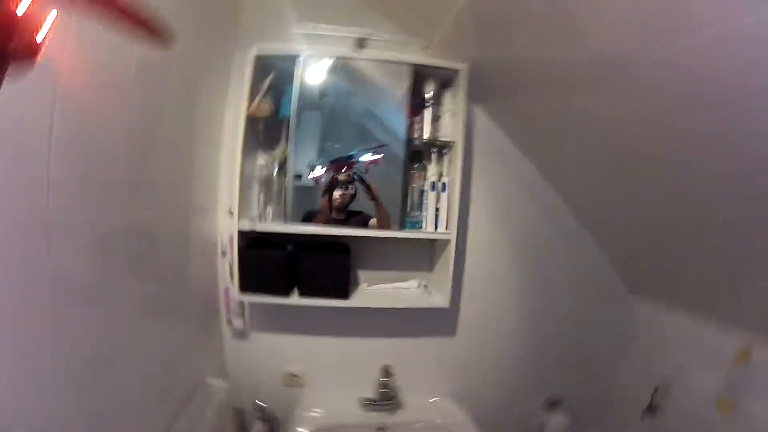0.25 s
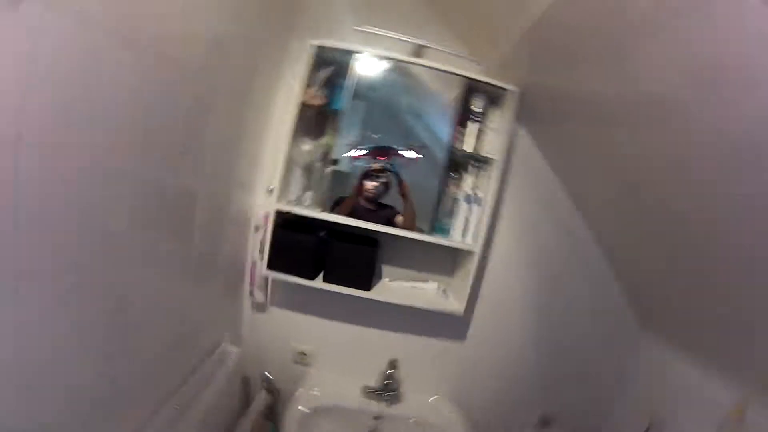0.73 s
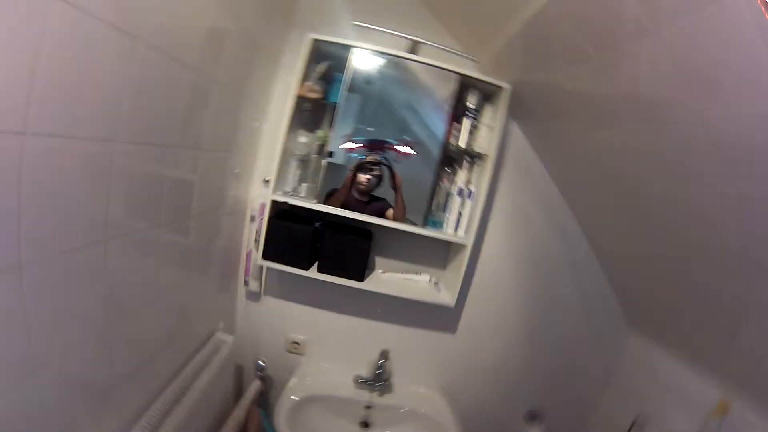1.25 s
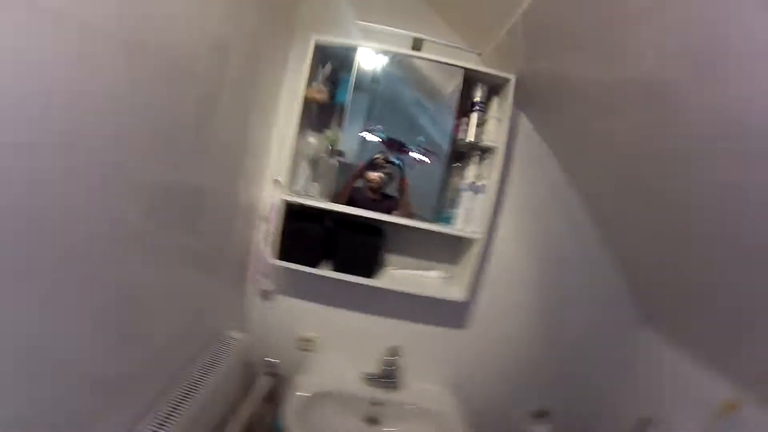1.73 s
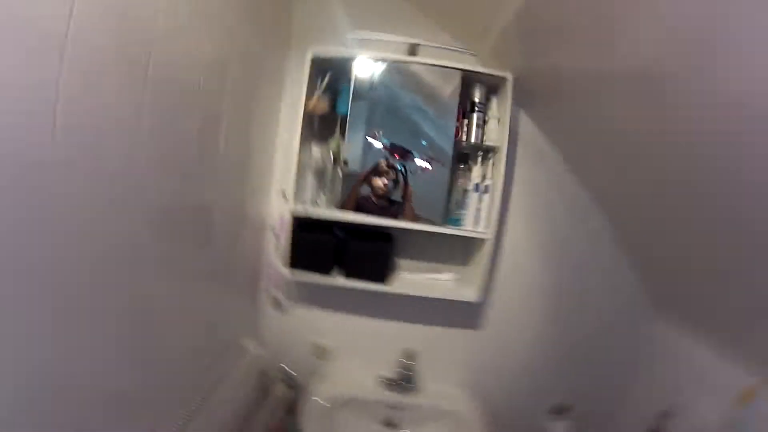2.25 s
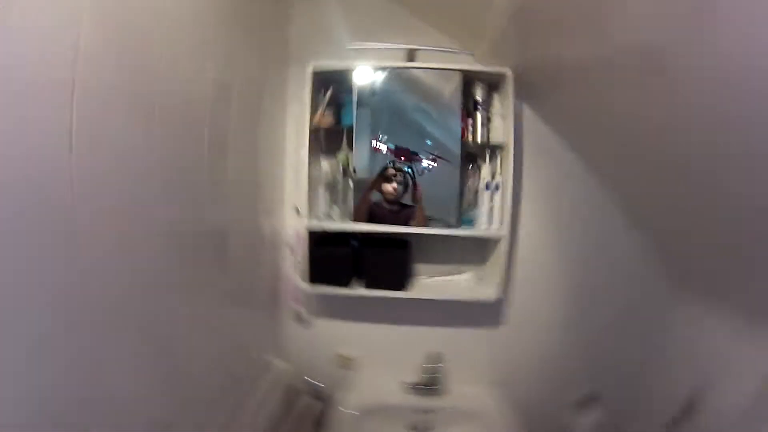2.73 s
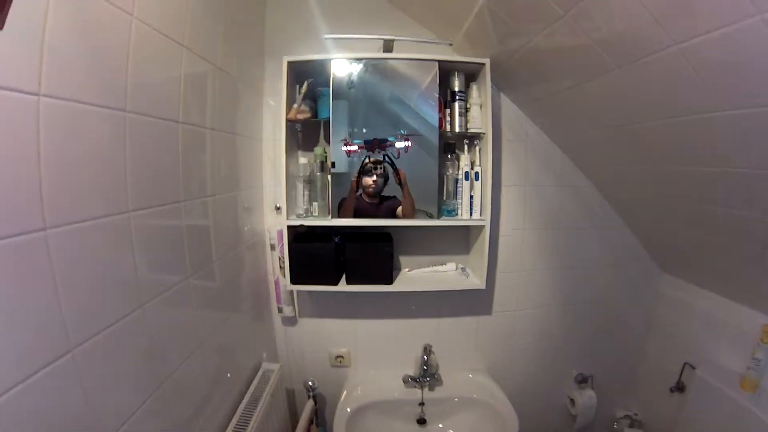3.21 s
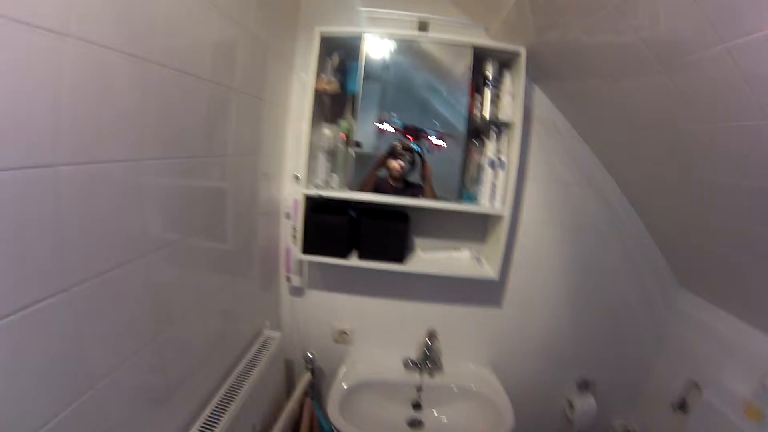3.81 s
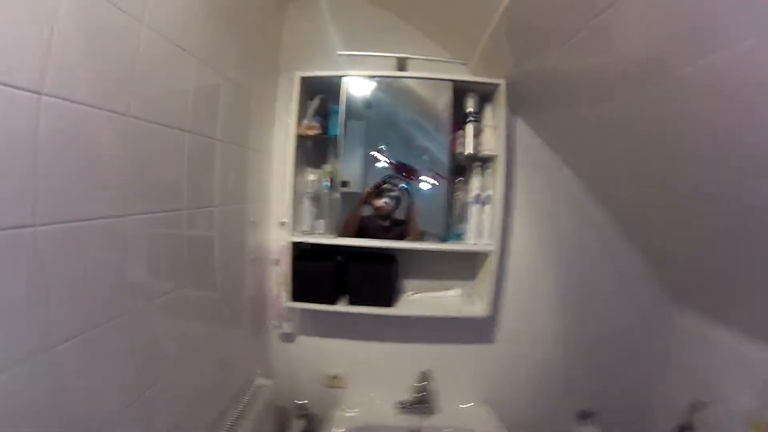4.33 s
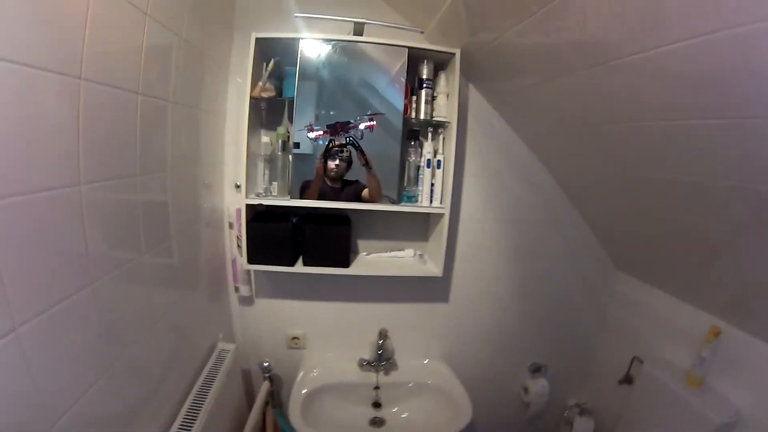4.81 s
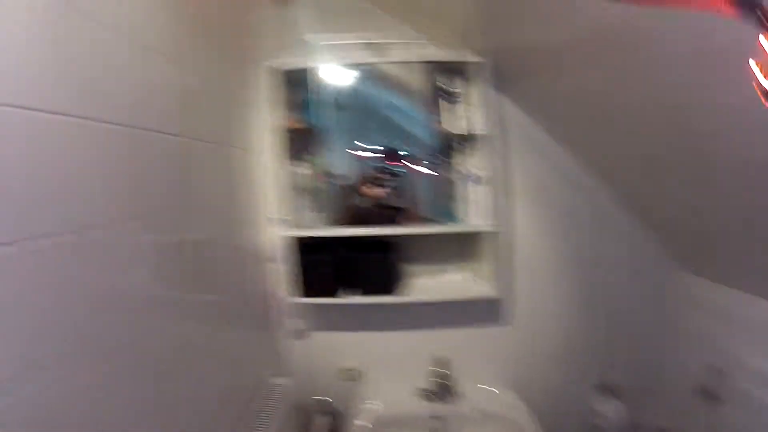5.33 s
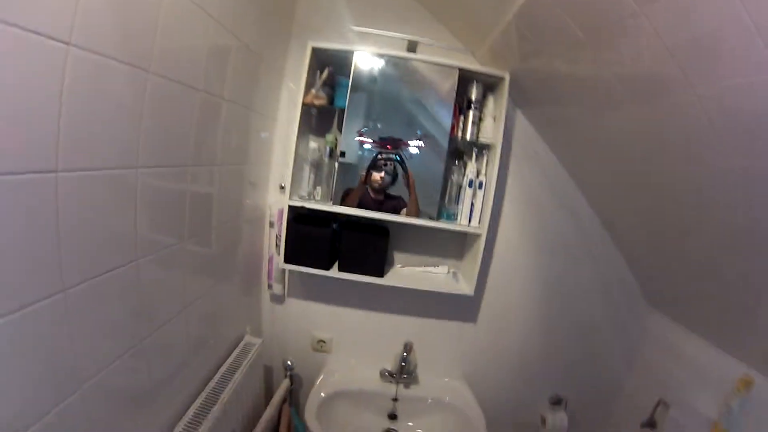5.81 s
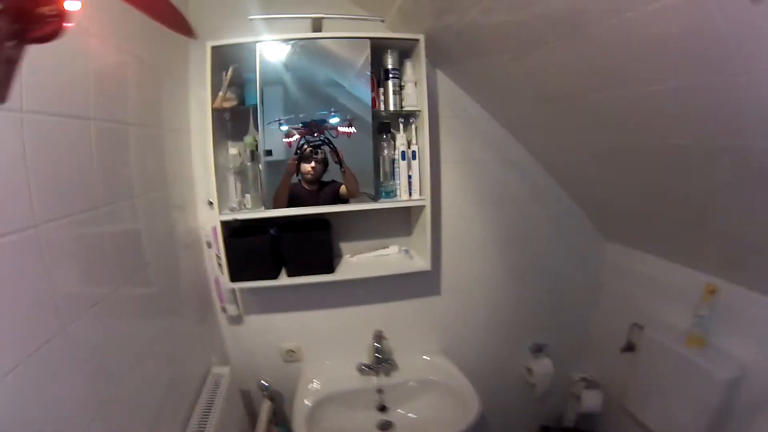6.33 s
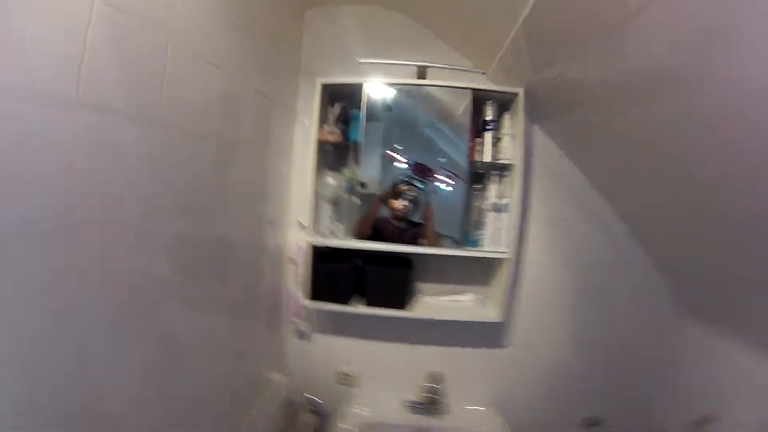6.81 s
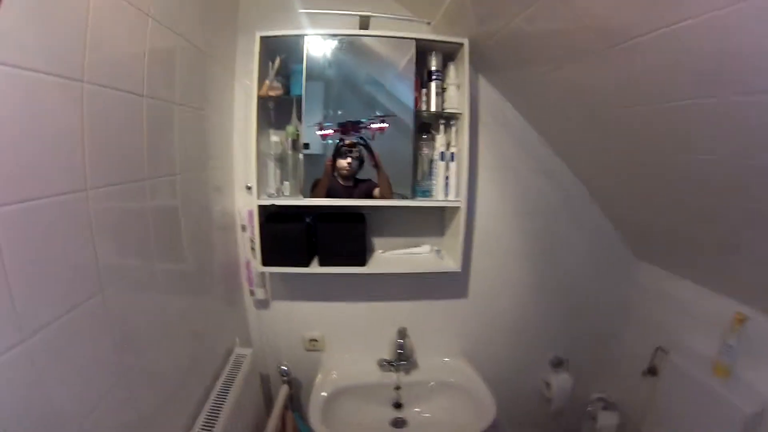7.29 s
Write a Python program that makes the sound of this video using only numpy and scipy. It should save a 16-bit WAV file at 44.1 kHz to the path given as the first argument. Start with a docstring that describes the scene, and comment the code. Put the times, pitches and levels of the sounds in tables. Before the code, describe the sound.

A dry, very close mono sound of two small metal-gear servos in a quiet tiled room with a short faint reflection. It opens with weak chatter and a brief low growl, then one slow rasping move at about 0.2 s. From 0.4 to 3.0 s the servo whirrs to and fro at full speed, ten bright buzzing swings of roughly a quarter second each, every one running up quickly, whining, and braking into the reversal. From 3.1 to 3.45 s it nearly stops: faint chatter and tiny metallic ticks. A harsh double grind follows at 3.5-3.8 s, then chatter, and slower grainy moves around 4.2, 4.5-5.0, 5.1-5.5, 5.7-6.1, 6.4-6.7 and 6.9-7.3 s, rising and sagging in pitch, with quieter chatter between. From 3.9 s a second servo growls softly and low underneath. A last tick and weak chatter close it near 7.5 s, above faint room hush and low rumble.

```python
"""A small tiled room; one microphone on a camera, very near the two metal-gear micro servos of its mount.
First a little chatter and one slow move, then the roll servo whirs to and fro at full speed.
Around three seconds it holds, chattering and ticking; after that come slow grinding moves, to the end.
There the tilt servo, heard briefly at the start, growls along through the bracket under the camera.
Rattle is noise cut into tooth contacts, whine is sines locked to the shaft; faint room noise lies below."""
import sys
import numpy as np
from scipy import signal
from scipy.fft import rfft, irfft, next_fast_len
from scipy.io import wavfile
from scipy.ndimage import uniform_filter1d, map_coordinates

SR = 44100
rng = np.random.default_rng(int(sys.argv[2]) if len(sys.argv) > 2 else 0)


def persist_wave(psi):
    """Save psi, clipped to +-1, as 16-bit WAV."""
    counts = np.round(np.clip(psi, -1, 1) * 32767).astype(np.int16)
    wavfile.write(sys.argv[1], SR, np.atleast_2d(counts).T)


N = 333396

# Roll servo, full-speed swings: start t/s, length t/s, braking t/s, direction (1 forward, 0 backward),
# level/dB before the gain for speed
SWINGS = [(.418, .259, 0.034, 0, -27), (0.669, 0.26, 0.064, 1, -27), (0.933, 0.28, 0.038, 0, -27),
          (1.199, 0.27, 0.048, 1, -27), (1.479, .288, 0.039, 0, -26.5), (1.761, 0.28, .048, 1, -26.5),
          (2.053, .276, .042, 0, -27), (2.328, .284, .09, 1, -27), (2.596, .26, .07, 0, -27),
          (2.853, 0.19, 0.096, 1, -26.5)]
# Roll servo, slow moves: start t/s, speeding up t/s, slowing down t/s, top speed f/Hz, last speed f/Hz,
# direction (1 forward, 0 backward), level/dB before the gain for speed
SLOW_MOVES = [(.165, 0.096, 0.12, 112.4, 43.98, 1, -25), (3.47, .074, .012, 112, 110.2, 1, -24.5),
              (3.562, 0.17, 0.085, 177.9, 44.8, 0, -27), (4.158, .125, .08, 134.8, 54.95, 0, -28.5),
              (4.478, 0.15, 0.44, 126, 56.05, 1, -28.5), (5.085, .315, 0.11, 148.7, 128.8, 0, -27.5),
              (5.678, .05, 0.42, 136.8, 58, 1, -27), (6.395, 0.16, 0.14, 152.5, 119.2, 0, -27.5),
              (6.925, .07, .29, 120.2, 64.02, 1, -27)]
# Roll servo, chatter against its load between moves: start t/s, length t/s, motor speed f/Hz, mean level/dB
CHATTER = [(0, 0.16, 43.53, -39), (3.082, 0.067, 40, -37), (3.174, 0.042, 40.44, -42.5),
           (3.27, 0.039, 40.44, -55), (3.32, .1, 40.06, -46), (3.867, 0.26, 47.9, -38.5),
           (4.361, 0.12, 61.9, -40.5), (5.508, 0.12, 52.77, -40), (6.225, 0.1023, 49.86, -39.5),
           (6.321, 0.082, 65.3, -35), (6.699, 0.14, 52.9, -38), (6.859, 0.074, 49.7, -42),
           (7.409, .022, 40.9, -38), (7.454, 0.12, 40.9, -38.5)]
# Tooth rattle, colour: f/Hz, relative level/dB
RATTLE_COLOUR = [(60, -33), (300, -10.5), (700, -16), (1100, -12.5), (1700, -2), (2500, -2.5), (4000, 5),
                 (5500, 6.5), (7000, 2.5), (9500, 7), (10700, 4.5), (13500, 4.5), (14300, 3), (15500, -1.5)]
# Case resonances: f/Hz, width f/Hz, forward level/dB, backward level/dB,
# level/dB added when labouring at part speed forward, the same backward
CASE_MODES = [(1436.8, 1600, -28, -28, 10.5, 14), (2747, 630, -16.5, -14.5, 4, 4),
              (3460, 190, -18.5, -19, 7, 1), (4860, 490, -24, -14.5, -8, -1),
              (7100, 730, -11.5, -23, 0.5, -3), (8375, 2050, -5.5, -5.5, -1, -1),
              (11480, 770, -4, -7, -9.5, 0.5)]
# Gear whine: cycles per turn of the first wheel, one entry a line
WHINE_CYCLES = [3, 8, 16, 22, 24, 30, 32, 38, 42, 48, 54, 60, 72, 78, 80, 102, 120]
# Mean level/dB of each whine line before the gains for speed, turning forward and backward
WHINE_FORWARD_DB = [-29.5, -27.5, -36.5, -25.5, -19, -35, -23.5, -28.5, -34, -38, -23.5, -16, -15, -9,
                    -13.5, -9.5, -28]
WHINE_BACKWARD_DB = [-45, -25, -41, -42, -17.5, -39, -41, -17, -48, -21.5, -43, -10, -36, -19, -8, -38, -9]
# Gear backlash ticks: t/s, relative level/dB
TICKS = [(3.096, -22), (3.1817, -21.5), (3.2017, -26), (3.2792, -20), (3.308, -23.5), (3.3241, -24),
         (3.352, -20.5), (3.3976, -22), (3.4054, -25), (3.4154, -22), (3.426, -24), (3.8777, -18.5),
         (7.456, -19)]
# Tilt servo, moves: start t/s, speeding up t/s, slowing down t/s, nominal top speed f/Hz, nominal top level/dB
TILT_MOVES = [(-.06, .09, .17, 64, -47.5), (3.88, .155, 0.093, 124, -44),
              (4.155, 0.037, 0.096, 100.3, -46.5), (4.2, .1, .15, 106.6, -44.5),
              (4.38, .12, .14, 68, -48.5), (4.63, .15, .28, 75.9, -48.5), (5.07, .06, .24, 56, -50),
              (5.39, .13, .14, 114, -47.5), (5.68, .22, .2, 57.7, -58), (6.135, .17, 0.29, 76.2, -47.5),
              (6.55, 0.21, 0.28, 99.56, -46.5), (7.11, 0.061, 0.4, 66.17, -50.5)]
# Tilt bracket resonances: f/Hz, width f/Hz, relative level/dB
BRACKET_MODES = [(134, 39, -9), (241.5, 7, 5), (315, 48, -3.5), (449, 82, -7.5), (545, 84, -3),
                 (905, 85, -10)]
# Tilt gear hiss, colour: f/Hz, relative level/dB
HISS_COLOUR = [(300, -24), (1100, -12.5), (2700, 1), (3400, 4), (5000, 0), (6300, 3.5), (7800, 10),
               (9700, -4.5), (11300, 1.5), (13000, -5), (15500, -8)]
# Tiled room: f/Hz, 60 dB decay t/s
ROOM_DECAY = [(200, 0.43), (2000, 0.2), (12000, 0.12)]
# Room and microphone floor, colour: f/Hz, relative level/dB
FLOOR_COLOUR = [(15, -1), (45, 7), (65, -4), (95, -16), (250, -1.5), (700, -17), (3000, -8.5),
                (15000, -42.5)]

TEETH, REDUCTION = 8, 3  # pinion teeth; motor turns per turn of the first wheel
FORWARD_HZ, BACKWARD_HZ, SPIN_UP_S = 202.36, 193.25, .03  # top motor speeds; time constant of the run-up
SAG_HZ_PER_S = 48  # a backward swing loses speed against the load
REVERSAL_HZ = 49  # lowest speed used for swing level: the gears never quite stop rattling
RACING_DB, RACING_FROM_HZ = 2.5, 156  # extra level as the forward speed nears its top
BRAKE_DB, BRAKE_SWELL_S = 1, 0.062  # the teeth knock harder as backward braking sets in
BREAKAWAY_HZ, SLOWING_POWER = 53.93, 1.35  # speed at which a slow move starts; bend of the slowing
IDLE_HZ, IDLE_DB = 40, -47  # the roll servo holding still
CHATTER_WAVER_DB = 0.55
KNEE_HZ, KNEE_POWER = 102.6, 3.93  # below this motor speed the gears quieten quickly
ATTACK_S, RELEASE_S = .02, .014
SING_FROM_HZ, SING_DB_PER_OCTAVE = 228, 20  # the highest mesh tones fade below this motor speed
CREEP_RING_HZ, CREEP_WIDTH_HZ, CREEP_DB = 4900, 680, -13  # case resonance heard when creeping backward
CREEP_SPEED_HZ, CREEP_RANGE_HZ = 95, 32  # the motor speeds that excite it
TILT_IDLE_HZ, TILT_IDLE_DB = 41.93, -65  # the tilt servo holding still
TILT_SWELL_DB = 10  # rise of level over a full arch of speed
TOP_HZ = 15550  # band limit of the camera


def roll_servo(speed, level_db, forward):
    """Tooth rattle rings the case, the meshes whine; each direction loads other tooth flanks."""
    def flank(forward_db, backward_db):
        return backward_db + forward * (forward_db - backward_db)

    octaves = np.log2(speed / 150)
    # Below full speed the motor is driven in short kicks, less so in a hard run-up.
    run_up = acceleration(speed, full=1500)
    throttled = np.clip((178 - speed) / 40, 0, 1) * (1 - .75 * run_up)
    turns = shaft(speed, flutter=.002 + .045 * throttled)
    labour = throttled * np.clip((speed - 70) / 55, 0, 1)
    # The kicks make the rattle grainy.
    kicks = amp(np.clip(.5 - 2.3 * octaves, 0, 4) * wobble(260))

    def contact():
        return steady(teeth(turns, scatter_db=3.0, sharpness=3.2, worn=0.52) * kicks)

    rattle = amp(-1.5) * coloured(contact(), RATTLE_COLOUR)
    for hz, width, forward_db, backward_db, *labour_db in CASE_MODES:
        ring_db = flank(forward_db, backward_db) + flank(*labour_db) * labour
        rattle += amp(ring_db) * unit(ringing(contact(), hz, width))
    creep = (1 - forward) * np.exp(-((speed - CREEP_SPEED_HZ) / CREEP_RANGE_HZ) ** 2)
    rattle += amp(CREEP_DB) * creep * unit(ringing(contact(), CREEP_RING_HZ, CREEP_WIDTH_HZ))
    # Lightly loaded teeth land softly and lose their top.
    top = filtered(rattle, lambda f: 1 / (1 + (8500 / (f + 1)) ** 6))
    rattle += (amp(np.minimum(level_db + 22.0, 0)) - 1) * top

    whine = gear_lines(turns, map(flank, WHINE_FORWARD_DB, WHINE_BACKWARD_DB))
    # The low mesh tones travel through the bracket; the high ones need speed to sing out.
    low = filtered(whine, lambda f: 1 / (1 + (f / 560) ** 8))
    highest = filtered(whine, lambda f: 1 / (1 + (4200 / (f + 1)) ** 12))
    sing = amp(SING_DB_PER_OCTAVE * np.minimum(np.log2(speed / SING_FROM_HZ), 0))
    high = whine - low + (sing - 1) * highest
    low_db = -3 + flank(1.3, 6.2) * throttled + 9.9 * np.minimum(octaves + 0.59, 0)
    high_db = 1.5 - 6.9 * throttled + flank(6.6, 16) * np.minimum(octaves, 0)
    whine = amp(low_db) * low + amp(high_db) * high
    return amp(level_db) * (rattle + whine + forward * squeal(speed))


def roll_motion():
    """Motor speed (Hz), level (dB) and share of forward drive, from the swings, slow moves and chatter."""
    t = np.arange(N) / SR
    speed, gain, forward = np.full(N, 1. * IDLE_HZ), np.full(N, amp(IDLE_DB)), np.zeros(N)

    def add(span, hz, loudness, direction):
        """The strongest drive sets speed and level, the last one added sets direction."""
        speed[span] = np.maximum(speed[span], hz)
        gain[span] = np.maximum(gain[span], loudness)
        forward[span] = direction > .5

    for start, length, braking, direction, db in SWINGS:
        span = (t > start) & (t < start + length)
        u = t[span] - start
        top_hz = FORWARD_HZ if direction > .5 else BACKWARD_HZ - SAG_HZ_PER_S * u
        hz = top_hz * (1 - np.exp(-u / SPIN_UP_S)) * glide(u, length - braking, braking, 1, 1, 0)
        if direction > .5:
            extra_db = RACING_DB * np.clip((hz - RACING_FROM_HZ) / (FORWARD_HZ - RACING_FROM_HZ), 0, 1)
        else:
            extra_db = BRAKE_DB * np.exp(-((u - length + braking) / BRAKE_SWELL_S) ** 2)
        add(span, hz, gear_gain(np.maximum(hz, REVERSAL_HZ)) * amp(db + extra_db), direction)
    for start, length, hz, db in CHATTER:
        span = (t > start) & (t < start + length + RELEASE_S)
        waver_db = CHATTER_WAVER_DB * wobble(40)[span]
        add(span, hz, amp(db + waver_db) * gate(t[span] - start, length), 0)
    for start, rise, fall, top_hz, last_hz, direction, db in SLOW_MOVES:
        span = (t > start) & (t < start + rise + fall + RELEASE_S)
        u = t[span] - start
        hz = glide(u, rise, fall, BREAKAWAY_HZ, top_hz, last_hz)
        on = gate(u, rise + fall)
        add(span, hz * np.sqrt(on), gear_gain(hz) * amp(db) * on, direction)
    return speed, 20 * np.log10(gain), uniform_filter1d(forward, size=600)


def gear_gain(speed):
    """The gears grow steeply louder with speed, then level off."""
    return 1 / np.sqrt(1 + (KNEE_HZ / (speed + 1)) ** KNEE_POWER)


def steady(x):
    """The load sets the level and the teeth only share it out; elastic gears cap the hardest knocks."""
    shared = x / np.sqrt(np.abs(uniform_filter1d(x ** 2, size=500)) + 1e-9)
    return np.tanh(shared / 2.2)


def gear_lines(turns, levels_db):
    """Mesh tones that follow the shaft, each a little unsteady in phase and level."""
    out = np.zeros(N)
    for cycles, db in zip(WHINE_CYCLES, levels_db):
        phase = 2 * np.pi * cycles * turns / REDUCTION + 0.22 * wobble(150)
        out += amp(db + 2.94 * wobble(30)) * np.sin(phase)
    return out


def squeal(speed):
    """Upper mesh tones ring a case resonance: clean in a fast run-up, rough at a crawl."""
    run_up = acceleration(speed, full=700)
    turns = shaft(speed, flutter=.025 - .023 * run_up)

    def mesh(orders):
        return sum(np.sin(2 * np.pi * order * turns) for order in orders)

    fast = run_up * np.clip((speed - 110) / 35, 0, 1)
    sweep = fast * ringing(mesh((20, 24)), 3550, 1300)
    crawl = np.clip((150 - speed) / 20, 0, 1) * np.clip((speed - 50) / 25, 0, 1) * (1 - run_up)
    squeak = crawl * ringing(mesh((24, 26, 30, 34, 40, 48)), 3320, 480)
    return amp(-6) * (sweep + squeak)


def backlash():
    """A holding servo nudges its gears across their play: tiny metal ticks, noise crack and ring."""
    t = np.arange(SR // 20) / SR
    out = np.zeros(N + SR)
    for start, db in TICKS:
        crack = amp(-60 * t / 0.01) * rng.standard_normal(len(t))
        ring = np.zeros(len(t))
        for hz, t60 in [(2850, 0.0087), (4900, 0.0085)]:
            ring += amp(-60 * t / t60) * np.sin(2 * np.pi * hz * t) * rng.uniform(0.33, 1)
        out[round(start * SR):][:len(t)] += amp(db - 7.0) * (crack + 0.8 * ring)
    return ringing(out[:N], 5000, 13000)


def tilt_servo(speed, level_db):
    """Its teeth shake the bracket under the camera; the second mesh hums when it speeds up."""
    turns = shaft(speed, flutter=.03)
    contact = teeth(turns, scatter_db=2, sharpness=6.5, worn=0.38)

    def bracket(f):
        """Modes of alternating sign, summed."""
        return sum((-1) ** k * amp(db) * resonance(f, hz, width)
                   for k, (hz, width, db) in enumerate(BRACKET_MODES))

    growl = amp(0.5) * unit(filtered(contact, bracket))
    mesh = 2 * np.pi * turns * TEETH / REDUCTION
    hum_db = np.clip(22 * np.log2(speed / 115), -14, 2) + 4.5 * wobble(60)
    hum = amp(hum_db) * (np.sin(mesh) + 0.14 * np.sin(2 * mesh))
    # The airborne hiss follows the level on its own slope.
    hiss_db = -44 + 1.1 * (level_db + 49.5)
    hiss = amp(hiss_db) * coloured(contact * amp(1.9 * wobble(110)), HISS_COLOUR)
    return amp(level_db) * (growl + hum) + hiss


def tilt_motion():
    """Motor speed (Hz) and level (dB): every move is one arch, louder as it speeds up."""
    t = np.arange(N) / SR
    speed, gain = np.full(N, 1. * TILT_IDLE_HZ), np.full(N, amp(TILT_IDLE_DB))
    for start, rise, fall, top_hz, db in TILT_MOVES:
        span = (t > start) & (t < start + rise + fall + RELEASE_S)
        u = t[span] - start
        arch = glide(u, rise, fall, 0, 0.98, 0)
        loudness = amp(db + TILT_SWELL_DB * (arch - 1)) * gate(u, rise + fall)
        speed[span] = np.maximum(speed[span], TILT_IDLE_HZ + (top_hz - TILT_IDLE_HZ) * arch)
        gain[span] = np.maximum(gain[span], loudness)
    return speed, 20 * np.log10(gain)


def shaft(speed, flutter):
    """Turns made by a slightly unsteady motor."""
    return np.cumsum(speed * (1 + flutter * wobble(120))) / SR


def acceleration(speed, full):
    """Share of a hard run-up, 0 to 1; full is the rise of motor speed in Hz per second that counts as 1."""
    return np.clip(np.gradient(uniform_filter1d(speed, size=900)) * SR / full, 0, 1)


def teeth(turns, scatter_db, sharpness, worn):
    """Each pinion tooth lands with its own force and scrapes off; the wear marks repeat with the wheel."""
    count, phase = np.divmod(turns * TEETH, 1)
    force = amp(scatter_db * rng.standard_normal(N))[count.astype(int)]
    marks = rng.standard_normal(size=600)
    wear = map_coordinates(marks, [turns / REDUCTION % 1 * len(marks)], mode='grid-wrap')
    return unit(force * np.exp(-sharpness * phase) * (rng.standard_normal(N) + worn * wear))


def glide(t, rise, fall, first_hz, top_hz, last_hz):
    """Motor speed of one move: it eases up to its top, then slows ever faster."""
    up = np.sin(np.pi / 2 * np.clip(t / rise, 0, 1))
    down = np.clip((t - rise) / fall, 0, 1) ** SLOWING_POWER
    return first_hz + (top_hz - first_hz) * up + (last_hz - top_hz) * down


def gate(t, length):
    """On from t = 0 for a length of time, with a short attack and release."""
    return np.clip(t / ATTACK_S, 0, 1) * np.clip(1 - (t - length) / RELEASE_S, 0, 1)


def room(x):
    """The tiled walls answer after 5 ms with a brief noise tail, decaying sooner in the treble."""
    hz, t, z = signal.stft(rng.standard_normal(SR // 2), SR, nperseg=256)
    decay = amp(-60 * t / along(ROOM_DECAY, hz)[:, None])
    tail = signal.istft(z * decay, SR, nperseg=256)[1]
    return signal.fftconvolve(x, np.pad(tail, (SR // 200, 0)) / np.linalg.norm(tail))[:N]


def floor(roll_db):
    """Faint room and microphone noise, and a low rumble of the swaying mount."""
    hush = amp(-57) * coloured(rng.standard_normal(N), FLOOR_COLOUR)
    rumble = unit(ringing(rng.standard_normal(N), 49.0, 36.0))
    rumble_db = -51.5 + 0.16 * np.maximum(roll_db, -42) + 2.9 * wobble(5.7)
    return hush + amp(rumble_db) * rumble


def amp(db):
    """Decibels to gain."""
    return 10 ** (np.asarray(db) / 20)


def unit(x):
    """Scaled to rms 1."""
    return x / np.sqrt(np.mean(x ** 2) + 1e-20)


def along(points, hz):
    """(Hz, value) points interpolated on a log frequency axis."""
    f, v = np.transpose(points)
    return np.interp(np.log(hz + 1), np.log(f + 1), v)


def wobble(rate):
    """A smooth random curve, rate knots a second."""
    knots = rng.standard_normal(int(N * rate / SR) + 4)
    return map_coordinates(knots, [np.arange(N) * rate / SR])


def filtered(x, response):
    """x times a response of frequency."""
    m = next_fast_len(N + SR // 2)
    return irfft(rfft(x, m) * response(np.fft.rfftfreq(m, 1 / SR)), m)[..., :N]


def coloured(x, spectrum):
    """x with a (Hz, dB) colour, at rms 1."""
    return unit(filtered(x, lambda f: amp(along(spectrum, f))))


def resonance(f, hz, width):
    """Response of one damped mode."""
    return 1j * f * width / (hz * hz - f * f + 1j * f * width)


def ringing(x, hz, width):
    """x through the same damped mode twice."""
    return filtered(x, lambda f: resonance(f, hz, width) ** 2)


def scene():
    """Both servos very near one microphone, the tiled room behind them; two equal channels."""
    speed, level_db, forward = roll_motion()
    servos = roll_servo(speed, level_db, forward) + backlash() + tilt_servo(*tilt_motion())
    mono = servos + amp(-15) * room(servos) + floor(level_db)
    return np.array([mono, mono])


def record(dry):
    """The camera keeps nothing above its band limit."""
    return filtered(dry, lambda hz: hz < TOP_HZ)


dry = scene()
out = record(dry)
persist_wave(out)
```